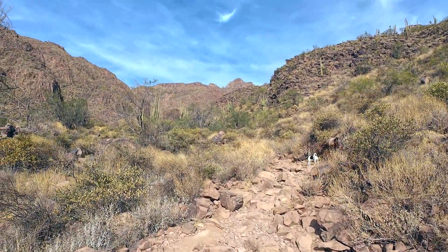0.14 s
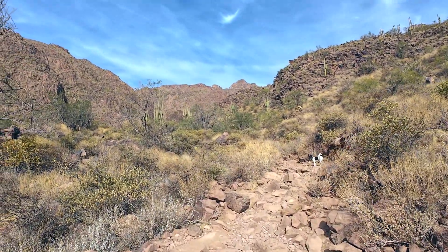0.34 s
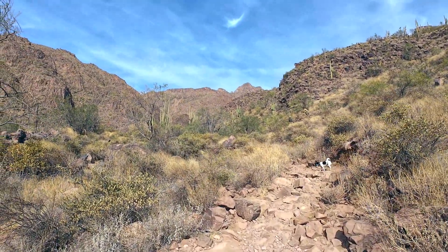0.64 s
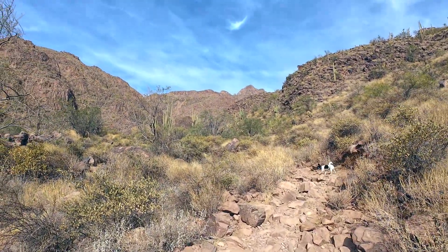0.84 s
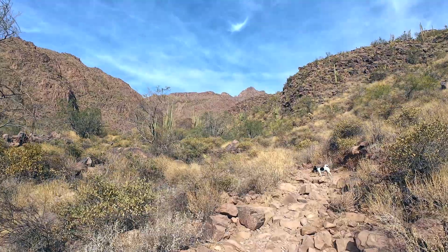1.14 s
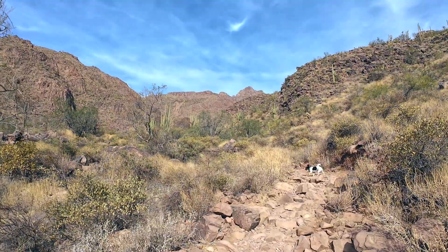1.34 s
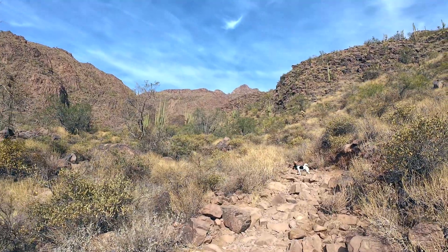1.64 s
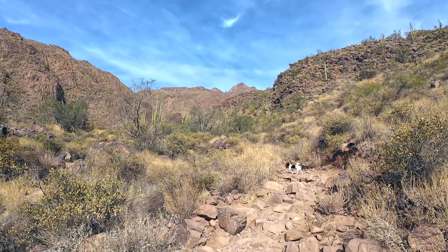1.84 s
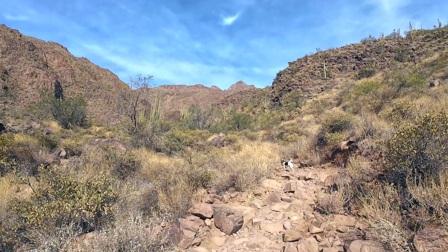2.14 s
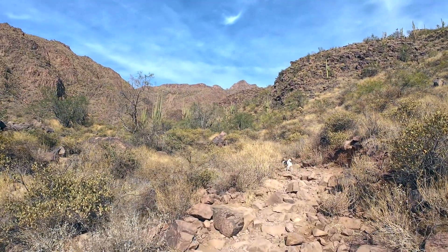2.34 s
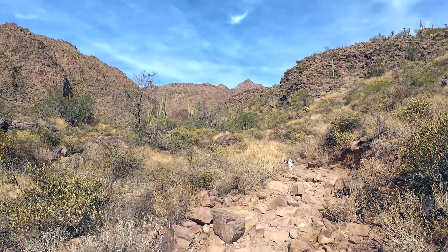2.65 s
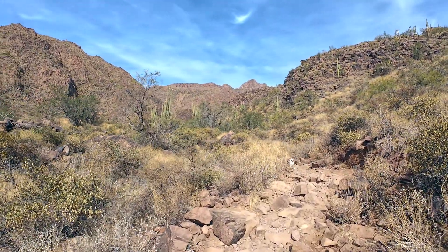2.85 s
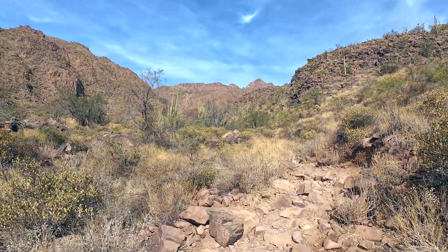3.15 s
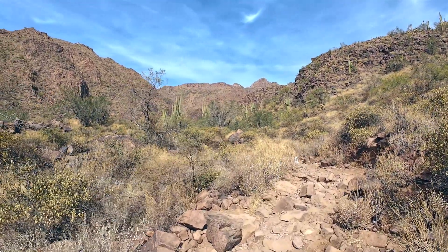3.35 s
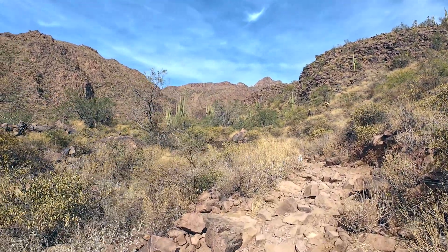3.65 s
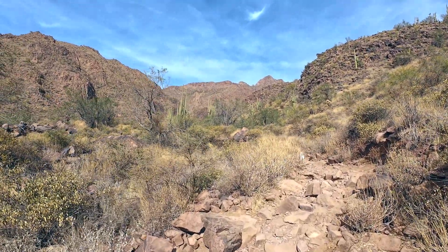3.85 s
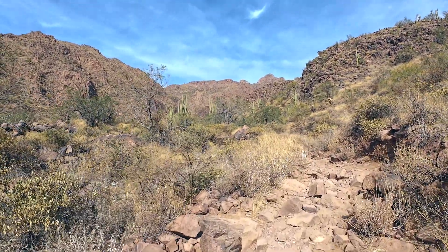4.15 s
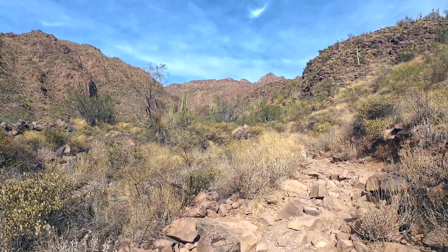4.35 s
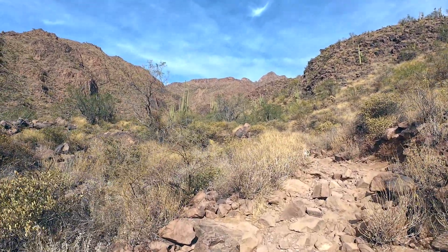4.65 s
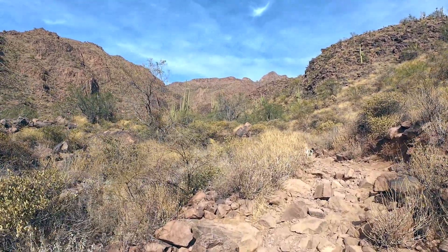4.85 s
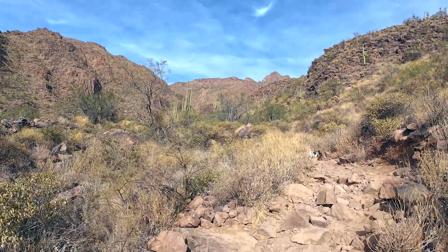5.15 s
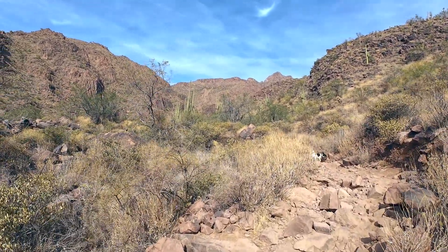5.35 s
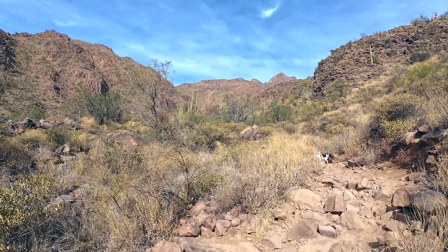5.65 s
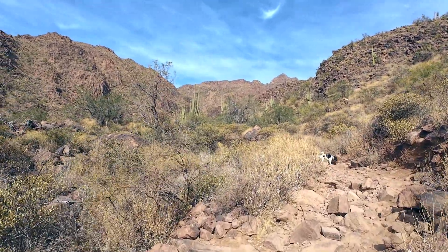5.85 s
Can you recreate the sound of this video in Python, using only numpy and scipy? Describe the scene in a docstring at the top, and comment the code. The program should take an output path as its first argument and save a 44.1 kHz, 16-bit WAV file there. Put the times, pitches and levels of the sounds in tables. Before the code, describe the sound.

A walker's uneven steps knock rocks and grind grit at close range, while small tags tinkle softly and a low wind puff ends it.

```python
"""A dry desert trail: a walker steps over loose stones, with small metal tags jingling nearby.
Tags and struck stones are decaying modes; grit, sand and sole are filtered trains of random clicks.
Tags and stones also echo off nearby rocks. Still air is faint shaped noise with slow patches,
and two puffs of wind are low noise, independent at the two ports."""
import sys
import numpy as np
from scipy import signal
from scipy.fft import rfft, irfft
from scipy.io import wavfile
from scipy.ndimage import uniform_filter1d

SR = 44100
rng = np.random.default_rng(int(sys.argv[2]) if len(sys.argv) > 2 else 0)


def output_pcm(signal):
    """Save a mono or channel-first signal as 16-bit PCM at the path in sys.argv[1].

    Samples are clipped to [-1, 1] before scaling.
    """
    pcm = np.clip(np.atleast_2d(signal).T, -1, 1) * 32767
    wavfile.write(sys.argv[1], SR, np.round(pcm).astype(np.int16))


N = 264159  # samples


def gain_of(db):
    """Level law: amplitude ratio from decibels."""
    return 10 ** (np.asarray(db) / 20)


def evened(x):
    """Normalisation by power: rms 1."""
    return x / np.sqrt(np.mean(x ** 2) + 1e-20)


def smoothed(x, width):
    """Low-pass filtering by two moving averages along time."""
    return uniform_filter1d(uniform_filter1d(x, width), width)


def read(points, hz):
    """Interpolation on a logarithmic frequency axis."""
    f, value = np.transpose(points)
    return np.interp(np.log(hz + 1), np.log(f + 1), value)


def panned(x, pan_db):
    """Interaural level difference: positive leans left."""
    return x * gain_of(np.array([[.5], [-.5]]) * pan_db)


def add(mix, s, sound):
    """Superposition: adds a sound starting at s seconds."""
    part = mix[:, round(s * SR):][:, :sound.shape[1]]
    part += sound[:, :part.shape[1]]


def paired(z, other, likeness, hz):
    """Partial coherence: left and right spectra from a shared part and a differing part."""
    same = np.clip(read(likeness, hz), 0, 1)[:, None]
    shared = np.sqrt((1 + same) / 2) * z
    apart = np.sqrt((1 - same) / 2) * other
    return np.array([shared + apart, shared - apart])


# spectrum of the still air before scaling to AIR_DB: f/Hz, level/dB [per Hz]
AIR_SPECTRUM = [(20, 12), (100, -5), (480, -4), (1050, -7), (2500, -17), (4500, -18), (7100, -30),
                (10100, -31), (12800, -43), (15500, -41)]
# left-right likeness of the air: f/Hz, likeness [0 to 1]
AIR_LIKENESS = [(30, 0.11), (200, 0.86), (8000, 0.15)]
AIR_DB = -62


def air():
    """Stationary random noise: faint hiss and rumble with patches drifting in time and frequency."""
    frames, hz = N // 256 + 5, np.fft.rfftfreq(1024, 1 / SR)
    a, b, c, d, patches = rng.standard_normal((frames, 513, 5)).T
    patches = evened(uniform_filter1d(uniform_filter1d(patches, 12, 0), 14, 1))
    level_db = read(AIR_SPECTRUM, hz)[:, None] + 2.54 * patches
    z = paired(a + 1j * b, c + 1j * d, AIR_LIKENESS, hz) * gain_of(level_db)
    noise = signal.istft(z, nperseg=1024, noverlap=768)[1][:, :N]
    return gain_of(AIR_DB) * evened(noise)


# tags touching: t/s [3 ms after the ring begins], then level/dB of each of five groups of tag modes
TAG_TOUCHES = [(0.1463, -67.5, -100, -95, -92, -99), (0.928, -69.5, -93, -97, -99, -99),
               (1.029, -92, -62, -97, -99, -99), (1.1656, -57.5, -50.5, -86, -66, -95),
               (1.1902, -56.5, -64, -84, -78, -95), (1.5863, -51, -63, -57, -85, -55.5),
               (1.707, -67, -56.5, -69, -64, -64.5), (1.774, -65.5, -63, -83, -61.5, -85),
               (1.807, -67, -61, -76, -78, -95), (1.855, -52.5, -64, -57, -89, -87),
               (2.042, -71, -66, -62.5, -98, -81), (2.058, -67, -65, -65, -91, -78),
               (2.1873, -95, -69, -93, -92, -80), (2.229, -70, -55, -81, -79, -71),
               (2.364, -69, -83, -59, -67, -80), (2.5686, -65.5, -69, -61, -90, -75),
               (2.7566, -71.5, -89, -89, -90, -90), (2.805, -72.5, -90, -95, -92, -99),
               (2.998, -69, -97, -84, -78, -67), (3.497, -76, -63.5, -94, -95.5, -99),
               (3.6514, -100, -79.5, -99, -97, -99), (3.7434, -78, -66.5, -63.5, -97, -93),
               (3.81, -67, -73, -62.5, -92, -99), (3.8994, -93, -73, -65.5, -91, -76),
               (3.9316, -80, -86, -84, -96, -99), (4.419, -78, -61.5, -62, -99, -99),
               (4.788, -77.5, -102, -99, -99, -99), (5.5214, -70, -73, -86, -100, -99),
               (5.7865, -76, -70, -85, -69, -80), (5.9314, -65.5, -68, -78, -85, -79)]
# tag modes: group [index], f/Hz, level/dB [relative], t60/s
TAG_MODES = [(0, 10370, 5.5, 0.061), (0, 9980, 22.5, 0.085), (1, 11630, 19.5, 0.1),
             (1, 10760, -22.5, 0.069), (2, 8860, -10, 0.041), (2, 8640, 15.5, 0.076), (3, 6065, 30, 0.043),
             (4, 5800, 11.5, 0.2), (4, 14400, -5, .14), (4, 14630, 26, .08)]
TAG_PAN_DB = -1.5
# phase lead of each mode at the left and right ports [cycles]: 0 and 14 microseconds
PORT_PHASE = np.array([[0], [1.4e-5]]) * np.transpose(TAG_MODES)[1]


def jingles():
    """Modal vibration: each touch rings the tags' modes, and continued brushing makes them flutter."""
    out, t = np.zeros((2, N)), np.arange(7000) / SR
    group, hz, db, t60 = np.transpose(TAG_MODES)[..., None]
    group = np.round(group).astype(int)
    swell = 1 - np.exp(-(t / 0.0053) ** 2)
    modes = gain_of(db - 60 * t / t60) * np.exp(2j * np.pi * hz * t) * swell
    for s, *group_db in TAG_TOUCHES:
        a, b = smoothed(rng.standard_normal((2, len(TAG_MODES), len(t))), 150)
        flutter = 1 + 0.59 * (evened(a) + 1j * evened(b))
        ringing = gain_of(np.array(group_db)[group]) * modes * flutter
        phase = PORT_PHASE + 0.27 * rng.random((2, len(TAG_MODES)))
        ports = np.exp(2j * np.pi * phase)
        add(out, s - .003, panned((ports @ ringing).imag, TAG_PAN_DB))
    return out


# scatter off nearby rocks: f/Hz, t60/s
ROCK_DECAY = [(100, 0.086), (2000, 0.075), (8000, 0.082)]
# left-right likeness of echoes and footfalls: f/Hz, likeness [0 to 1]
LIKENESS = [(30, 0.1), (70, 0.78), (140, 0.43), (300, 0.94), (1000, 0.99), (2500, 0.94), (4500, 0.47),
            (12000, 0.27)]


def rocks(x):
    """Scattering: sparse echoes of random sign, each band decaying at its own rate."""
    taps = np.zeros((2, 8000))
    at = np.arange(100, 7900, 20) + rng.integers(0, 20, (2, 390))  # one tap in every 20 samples
    np.put_along_axis(taps, at, rng.choice([-1., 1.], at.shape), 1)
    hz, t, z = signal.stft(taps, SR, nperseg=256)
    decay = gain_of(-60 * t / read(ROCK_DECAY, hz)[:, None])
    z = paired(z[0], z[1], LIKENESS, hz) * decay
    tail = signal.istft(z, SR, nperseg=256)[1]
    return signal.oaconvolve(x, tail / np.linalg.norm(tail[0]), axes=1)[:, :N]


# modes of a struck stone before detuning: multiple of its pitch [ratio], level/dB [relative]
STONE_MODES = [(1.0, 10), (1.27, -3.5), (.81, -1)]


def ring(t, hz, t60, rise_cycles, detune):
    """Damped modal vibration: a few modes around one pitch, detuned so that no two blows are alike."""
    modes = 0
    for (multiple, db), d in zip(STONE_MODES, detune):
        mode_hz = hz * multiple * (1 + .12 * (d - .5))
        modes = modes + gain_of(db) * np.sin(2 * np.pi * mode_hz * t)
    return modes * gain_of(-60 * t / t60) * (1 - np.exp(-(t * hz / rise_cycles) ** 2))


def hump(hz, centre_hz, octaves, skirt_db):
    """Band-pass response in dB: a bell on the octave scale, with a low skirt on the treble side."""
    x = np.log2((hz + 1) / centre_hz)
    bell = np.exp(-(x / octaves) ** 2 / 2)
    skirt = gain_of(skirt_db - 23 * abs(x)) * (1 + np.tanh(3 * x)) / 2
    return 20 * np.log10(bell + skirt + 1e-5)


# stone on stone: t/s, clack level/dB, clack f/Hz, thud level/dB, thud f/Hz, chip level/dB
STONE_KNOCKS = [(0.247, -62.5, 1763, -76, 296, -65), (0.303, -58, 1845, -71, 298, -63),
                (0.344, -58, 675, -23.5, 233, -55), (0.374, -40, 1775, -36, 355, -53),
                (0.382, -18.5, 638, -26.5, 350, -48), (0.396, -33, 580, -25.5, 270, -58),
                (0.48, -31.5, 1733, -32.5, 192, -28.5), (0.616, -30.5, 753, -37, 604, -34.5),
                (0.65, -31.5, 610, -28.5, 575, -43.5), (0.667, -35, 630, -34, 568, -53),
                (0.73, -52, 3650, -61, 300, -71), (1.122, -60, 5000, -40.5, 535, -64),
                (1.299, -32, 2570, -38, 322, -41), (1.309, -27.5, 2550, -23.5, 524, -34),
                (1.319, -24, 1650, -41, 260, -25), (1.405, -38, 980, -27.5, 320, -34),
                (1.51, -27, 1230, -29, 394, -27), (1.601, -30, 1140, -42.5, 505, -52),
                (1.784, -43, 1305, -50.5, 524, -56), (1.814, -36, 1032, -59, 590, -44.5),
                (1.872, -31.5, 1340, -48, 395, -44), (1.897, -42, 1153, -65, 410, -51),
                (1.968, -25, 1510, -45, 380, -30), (1.992, -26.5, 1192, -60, 380, -57),
                (2.175, -35, 1390, -63, 371, -54), (2.264, -21.5, 1126, -23, 530, -31),
                (2.277, -23, 1190, -20, 280, -16), (2.307, -29.5, 1190, -24.5, 529, -18.5),
                (2.343, -27, 1270, -34, 514, -26), (2.411, -26.5, 1270, -22.5, 400, -24),
                (2.45, -32, 810, -16.5, 394, -23), (2.521, -35, 890, -43, 580, -46),
                (2.628, -37.5, 3560, -34.5, 515, -20.5), (2.688, -30.5, 861, -28.5, 308, -29.5),
                (2.805, -43.5, 900, -47, 287, -42), (2.879, -44, 610, -33.5, 448, -63),
                (3.05, -26.5, 654, -22.5, 485, -37), (3.072, -27, 2210, -20, 416, -18),
                (3.178, -31.5, 1370, -23.5, 309, -40), (3.248, -25.5, 790, -22, 370, -37),
                (3.269, -26, 1130, -34, 310, -22), (3.812, -40, 671, -54, 632, -57.5),
                (3.864, -40, 961, -74, 600, -72), (3.891, -32.5, 882, -80, 556, -62),
                (3.905, -36.5, 692, -86, 565, -61), (4.019, -20.5, 570, -33, 563, -22),
                (4.028, -25, 863, -18.5, 490, -12.5), (4.176, -41, 1940, -65, 271, -20),
                (4.241, -42, 1840, -37, 387, -44), (4.287, -54.5, 2110, -65, 400, -63),
                (4.395, -47.5, 2960, -73, 400, -55), (4.58, -54, 1470, -71, 320, -55.5),
                (5.086, -33.5, 1474, -48, 447, -46), (5.132, -27, 1470, -30, 417, -20),
                (5.18, -23, 2000, -21, 240, -36), (5.267, -34.5, 1260, -39, 258, -27),
                (5.306, -14, 2000, -17.5, 272, -11.5), (5.433, -34, 3730, -28.5, 400, -20.5),
                (5.441, -41, 660, -26, 266, -22.5), (5.471, -53, 3700, -40, 305, -46)]
CHIP_HZ, CHIP_SPREAD_OCT = 2694, 0.43  # flakes ring from this pitch up to the spread above it
# t60 of a knock at RING_AT_DB and RING_MIDDLE_HZ; louder knocks sound shorter
RING_T60_S, RING_AT_DB, RING_HALVES_DB = 0.024, -32.5, 19.5
# bigger stones ring longer; twice as long if the clack is LOOSE_DB over the thud
RING_MIDDLE_HZ, RING_PITCH_LAW, LOOSE_DB = 975, 0.42, 46.5


def knocks():
    """Impact excitation: each knock is a clack, a thud into the ground and a short dry chip."""
    out, t = np.zeros((2, N)), np.arange(6000) / SR
    hz = np.fft.rfftfreq(len(t), 1 / SR)
    chances = rng.random((len(STONE_KNOCKS), 8))
    noises = rng.standard_normal((len(STONE_KNOCKS), len(t)))
    for row, chance, noise in zip(STONE_KNOCKS, chances, noises):
        s, clack_db, clack_hz, thud_db, thud_hz, chip_db = row
        t60 = RING_T60_S / 2 ** ((max(clack_db, thud_db) - RING_AT_DB) / RING_HALVES_DB)
        t60 *= (RING_MIDDLE_HZ / clack_hz) ** RING_PITCH_LAW
        t60 *= 2 ** (max(clack_db - thud_db, 0) / LOOSE_DB)
        clack = gain_of(clack_db) * ring(t, clack_hz, t60, 0.7, chance[:3])
        thud = gain_of(thud_db) * ring(t, thud_hz, t60 + 0.011, 0.92, chance[3:6])
        chip_hz = CHIP_HZ * 2 ** (CHIP_SPREAD_OCT * chance[7])
        crumbs = evened(irfft(rfft(noise) * gain_of(hump(hz, chip_hz, 0.41, -27)), len(t)))
        chip = gain_of(chip_db - 60 * t / (0.42 * t60)) * crumbs * (1 - np.exp(-t / 0.00076))
        # the flake rings on
        chip += gain_of(chip_db - 12.0 - 60 * t / t60) * np.sin(2 * np.pi * chip_hz * t)
        clack_pan_db = .3 + 6.8 * (chance[6] - .5)
        add(out, s, panned(clack, clack_pan_db) + panned(chip, 2.8) + thud)
    return out


def grains(per_s, spread_db, hiss, size, count=1):
    """Granular noise: clicks of very uneven size over a little hiss."""
    force = gain_of(spread_db * np.minimum(rng.exponential(1, (count, 1, size)), 4))
    force = force * (rng.random(force.shape) < per_s / SR)
    return (evened(force) + hiss) * rng.standard_normal((count, 2, size))


def pebbles(hz, lowest_hz, octaves, sharpness, count):
    """Resonance: each pebble rings briefly at its own pitch; together they cover the span."""
    place = (np.arange(count) + rng.random(count))[:, None, None] / count
    own_hz = lowest_hz * 2 ** (octaves * place)
    return 0.21 + 1 / (1 + 1j * sharpness * (hz / own_hz - own_hz / (hz + 1)))


def coloured(clicks, colour, hz):
    """Linear filtering: colours pairs of click trains, sums them over both ports, rms 1."""
    z = (rfft(clicks) * colour).reshape(-1, 2, len(hz)).sum(0)
    ports = paired(z[0][:, None], z[1][:, None], LIKENESS, hz)[..., 0]
    return evened(irfft(ports, clicks.shape[-1]))


# the sole grinding: start t/s, length/s, share of length before the peak [held within 0.02 to 0.98],
# grit level/dB, grit f/Hz, sole thud level/dB, fine sand level/dB
SOLE_SCUFFS = [(0.323, 0.034, 0.26, -60.5, 1590, -48, -69.5), (0.362, 0.082, 0.15, -55.5, 984, -44, -79),
               (0.467, 0.11, 0.096, -48, 2050, -49, -71), (0.601, 0.091, 0.72, -48.5, 914, -49.5, -62.5),
               (0.91, 0.025, 0.91, -83, 1130, -56.5, -96), (1.297, 0.045, 0.54, -25.5, 1697, -30.5, -48.5),
               (1.394, 0.18, 0.1, -42, 1260, -43.5, -67), (1.503, 0.047, 0.38, -28.5, 1390, -30.5, -44),
               (1.562, 0.064, 0.33, -43, 1095, -58, -55.5), (1.716, 0.26, 0.83, -48.5, 1320, -58, -67),
               (1.962, 0.25, 0.11, -54, 1190, -65.5, -71.5), (2.143, 0.12, 0.14, -46.5, 1390, -61.5, -71),
               (2.26, 0.051, 0.2, -33.5, 1390, -42, -67), (2.304, 0.092, 0.28, -28.5, 1546, -33, -47.5),
               (2.41, 0.038, 0.18, -29.5, 1566, -30, -39), (2.447, 0.052, 0.27, -36.5, 1970, -30.5, -35.5),
               (2.528, 0.21, 0.16, -55.5, 988, -54, -59), (2.617, 0.055, 0.21, -50.5, 3530, -57, -47),
               (2.686, 0.028, 0.032, -40.5, 1510, -35.5, -34),
               (2.785, 0.13, 0.074, -59.5, 1375, -54.5, -65.5), (2.943, 0.19, 0.5, -52.5, 1796, -53, -61),
               (3.048, 0.044, 0.2, -30.5, 1854, -34.5, -72), (3.171, 0.047, 0.17, -35.5, 1660, -36, -80),
               (3.202, 0.11, 0.37, -30, 1576, -26, -45.5), (3.994, 0.059, 0.47, -32, 1890, -37.5, -43),
               (4.081, 0.11, 0.64, -48.5, 2370, -62.5, -73), (4.188, 0.23, 0.2, -56, 1935, -56.5, -77.5),
               (4.36, 0.05, 0.9, -52.5, 2940, -63, -70), (4.418, 0.1, 0.55, -73, 1400, -60.5, -81),
               (4.86, 0.034, 0.56, -59, 1380, -48.5, -87), (4.942, 0.19, 0.65, -51, 1730, -68, -61),
               (5.073, 0.048, 1, -42, 1510, -46.5, -50), (5.123, 0.026, 0.39, -29, 1660, -38.5, -45.5),
               (5.155, 0.049, 0.64, -28.5, 1610, -24.5, -37.5), (5.258, 0.041, 0.24, -41, 1980, -47.5, -37),
               (5.305, 0.099, 0.09, -50.5, 1690, -49, -66), (5.43, 0.047, 0.2, -48, 3200, -42.5, -49.5),
               (5.501, 0.046, 0.066, -63, 1870, -45.5, -81), (5.561, 0.092, 0.4, -44, 3290, -46.5, -51),
               (5.775, 0.09, 0.55, -52, 3400, -55.5, -53.5), (5.812, 0.23, 0.37, -58.5, 1400, -37.5, -61)]
# relative spectrum of the sole thud: f/Hz, level/dB [per Hz]
SOLE_SPECTRUM = [(30, -39.5), (80, -23.5), (200, -4), (350, 0.5), (550, -3.5), (900, -14.5), (1500, -49),
                 (4000, -75)]
# relative spectrum of the fine sand: f/Hz, level/dB [per Hz]
SAND_SPECTRUM = [(2500, -13), (4800, -0.5), (7000, -11), (10000, -8), (12300, -13.5), (13600, -40)]
TREAD_DB = -44.5  # sole thud of a middling tread
# width of the grit under a middling tread; a heavier tread crushes all sizes
GRIT_OCT, GRIT_OCT_PER_DB = 0.752, 0.13
# under a light tread the grains stand apart, under a heavy one hiss fills the gaps
FILL_DB_PER_DB = 0.33
# finer grit sounds further left
GRIT_PAN_DB, GRIT_PAN_DB_PER_OCT, GRIT_MIDDLE_HZ = 1.1, 3, 1590
RISE_DB, EASE_DB = -10.5, -9.5  # a press starts and ends this far under its peak


def grind():
    """Friction of grains: under each press pebbles crack, the sole thuds in lumps and sand hisses."""
    out = np.zeros((2, N))
    for s, length, before, grit_db, grit_hz, sole_db, sand_db in SOLE_SCUFFS:
        octaves = np.clip(GRIT_OCT + GRIT_OCT_PER_DB * (sole_db - TREAD_DB), .4, 1)
        fill = gain_of(FILL_DB_PER_DB * (sole_db - TREAD_DB))
        pan_db = GRIT_PAN_DB + GRIT_PAN_DB_PER_OCT * np.log2(grit_hz / GRIT_MIDDLE_HZ)
        size = 16384 if length > .125 else 8192
        t, hz = np.arange(size) / SR, np.fft.rfftfreq(size, 1 / SR)

        grit_colour = pebbles(hz, grit_hz / 2 ** (1.5 * octaves), 3.214 * octaves, 27.0, count=6)
        grit_colour = grit_colour * gain_of(hump(hz, grit_hz, octaves, -29))
        grit = coloured(grains(160, 2.9, 0.46 * fill, size=size, count=6), grit_colour, hz)
        sand_colour = pebbles(hz, 3760, 1.78, 32.0, count=4) * gain_of(read(SAND_SPECTRUM, hz))
        sand = coloured(grains(400, 2.7, 0.4 * fill, size=size, count=4), sand_colour, hz)
        sole = coloured(grains(300, 3.05, 1.0, size=size), gain_of(read(SOLE_SPECTRUM, hz)), hz)

        u, before = np.clip(t / length, 0, 1), np.clip(before, .02, .98)
        rising_db = RISE_DB * (1 - u / before)
        easing_db = EASE_DB * (u - before) / (1 - before)
        press = gain_of(np.where(u < before, rising_db, easing_db))
        press *= 1 - np.exp(-t / 0.003)
        press *= gain_of(-60 * np.maximum(t - length, 0) / 0.14)

        # uneven load, partly common to grit, sand and sole
        slips = smoothed(rng.standard_normal((3, size)), 250)
        slips = gain_of(4.0 * np.tanh(evened(slips + .6 * slips[0]) / 1.5))
        high = gain_of(grit_db) * slips[0] * grit + gain_of(sand_db) * slips[1] * sand
        low = gain_of(sole_db) * slips[2] * sole
        add(out, s, press * (panned(high, pan_db) + low))
    return out


# puffs of wind on the ports: middle t/s, width/s [standard deviation], level/dB
WIND_PUFFS = [(4.031, 0.033, -52), (5.91, 0.065, -38.5)]
# relative spectrum of the wind: f/Hz, level/dB [per Hz]
WIND_SPECTRUM = [(20, -12), (75, 0), (160, -8), (600, -39.5), (2500, -80)]


def wind():
    """Incoherent turbulence noise: lumpy low puffs, unrelated at the two ports."""
    t, hz = np.arange(N) / SR, np.fft.rfftfreq(N, 1 / SR)
    noise = rfft(rng.standard_normal((2, N)))
    rumble = evened(irfft(noise * gain_of(read(WIND_SPECTRUM, hz)), N))
    puffs = sum(gain_of(db) * np.exp(-((t - s) / width) ** 2 / 2) for s, width, db in WIND_PUFFS)
    return rumble * puffs


def scene():
    """Superposition of all sources, with tags and stones also scattered off the rocks."""
    stones, tags = knocks(), jingles()
    echoes = rocks(gain_of(-7) * stones + gain_of(-9.5) * tags)
    return stones + tags + grind() + echoes + air() + wind()


# microphone response: f/Hz, level/dB
MIC_RESPONSE = [(20, -26.5), (60, -8), (130, -3), (11800, -1.5), (13000, -3), (15500, -28)]
EDGE_HZ = 15500


def record(dry):
    """Transducer response: the microphone loses deepest bass and top treble; then the band limit."""
    hz = np.fft.rfftfreq(N, 1 / SR)
    heard = irfft(rfft(dry) * gain_of(read(MIC_RESPONSE, hz)), N)
    low_pass = signal.firwin(511, EDGE_HZ, window=("kaiser", 9), fs=SR)
    return signal.oaconvolve(heard, low_pass[None], "same")


dry = scene()
out = record(dry)
output_pcm(out)
```